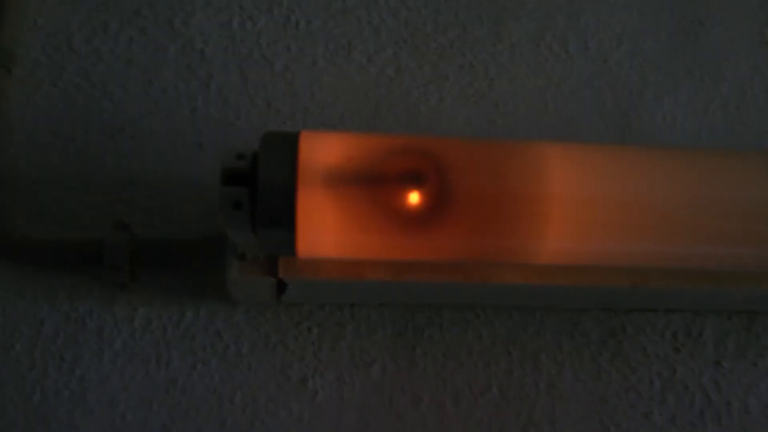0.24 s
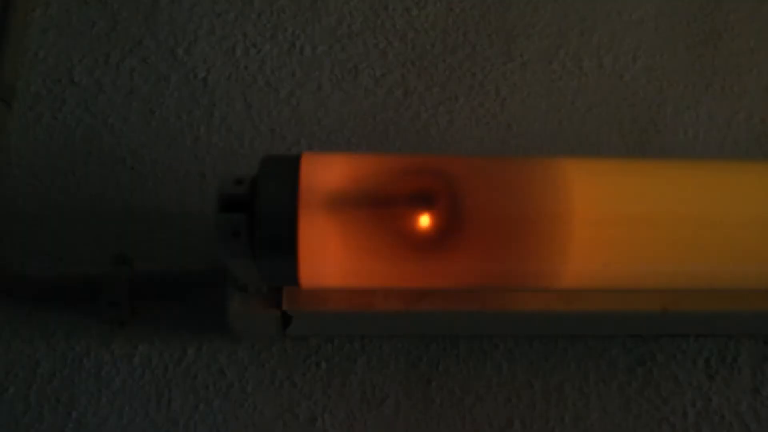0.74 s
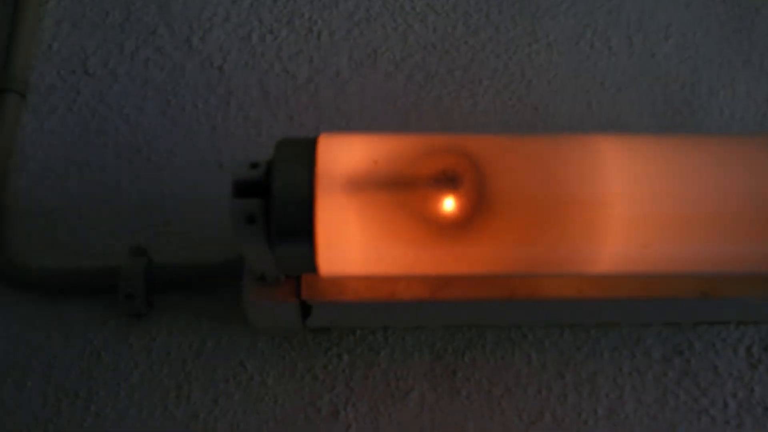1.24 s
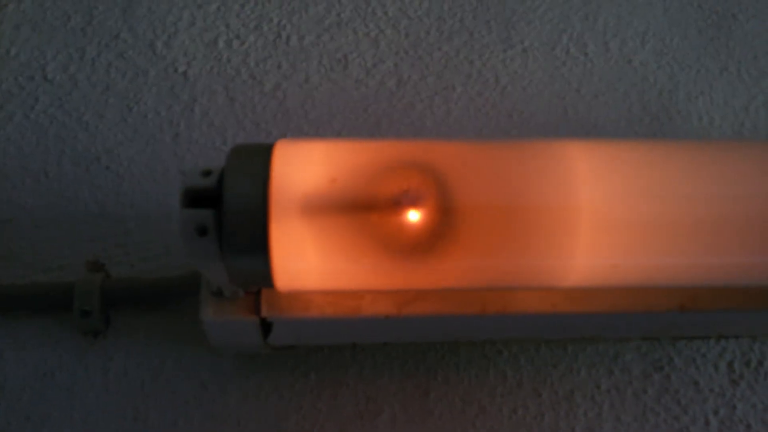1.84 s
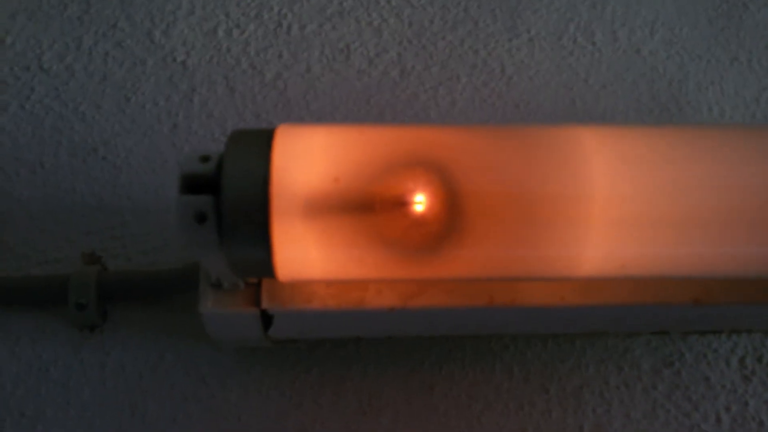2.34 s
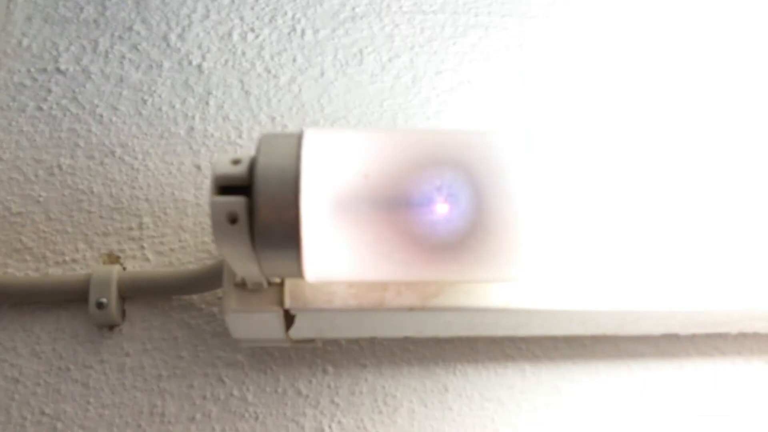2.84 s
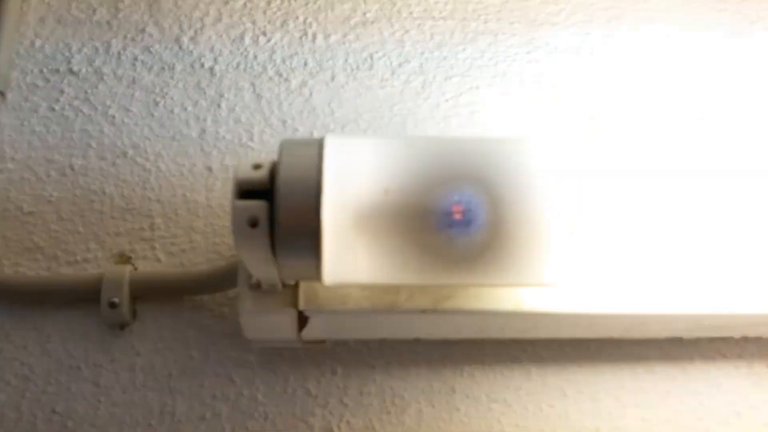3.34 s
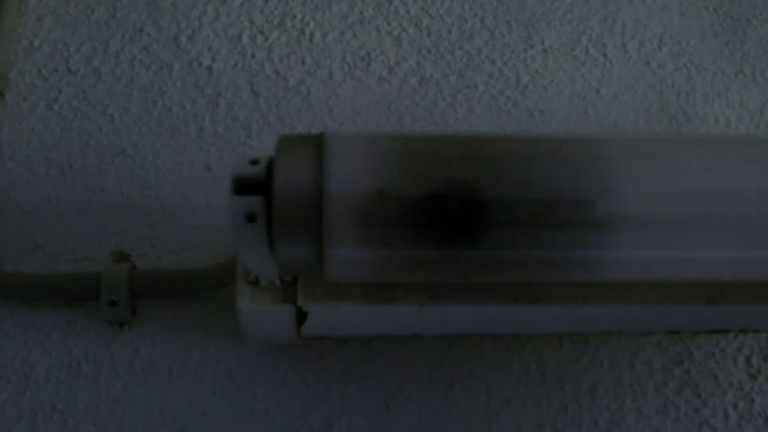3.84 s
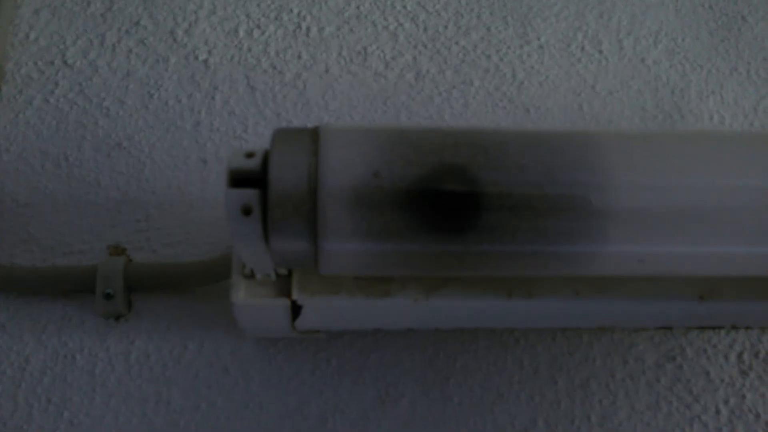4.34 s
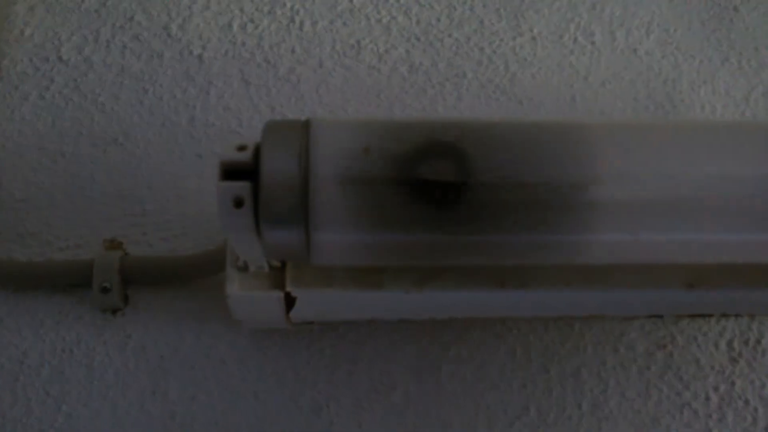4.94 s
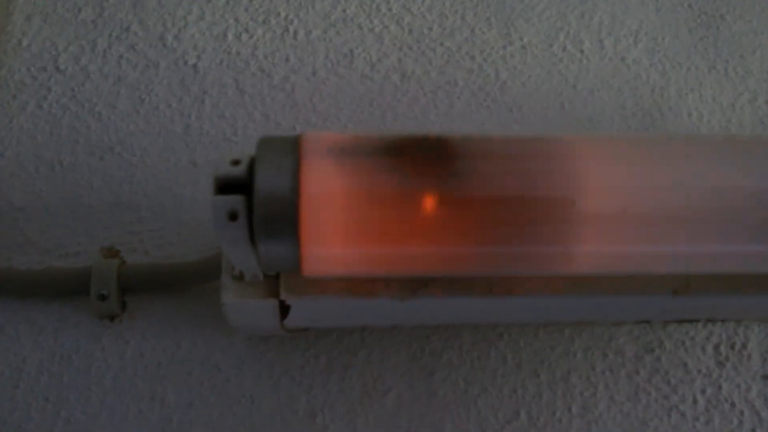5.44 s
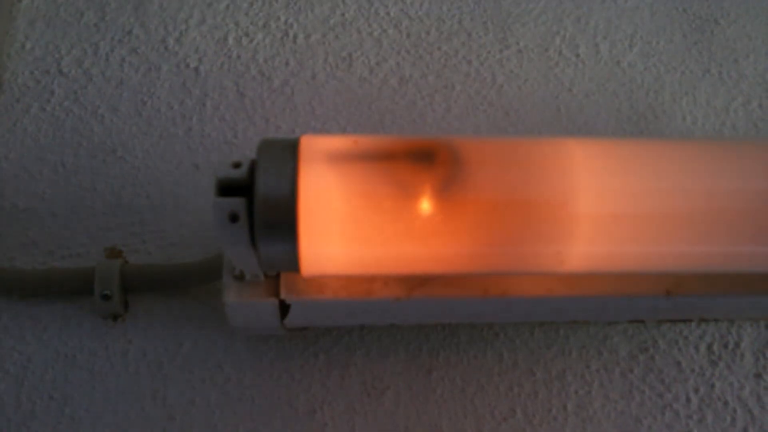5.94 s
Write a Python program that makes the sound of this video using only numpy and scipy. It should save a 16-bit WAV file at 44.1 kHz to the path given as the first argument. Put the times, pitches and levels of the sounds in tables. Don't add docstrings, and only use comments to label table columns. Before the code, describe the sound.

In a bare echoing room, a quiet building drone, steady soft hiss and low unsteady ballast hum lie under everything. At the start a far bird gives faint falling chirps and thin glass tones barely ring; a soft microphone bump comes at 0.2 s. Tiny dry starter clicks snap at 0.63 to 0.74 s, and the bird calls again near 1 s. A light metallic tick at 1.4 s leads to sharp jolts from 1.65 s, growing into a loud, ringing, tinny sheet-metal clatter at 1.9 to 2.2 s that dies in echo. Weaker ticks follow at 2.6 to 2.8 s, with a faint glass ping at 2.9. A knock and rattle comes at 3.4 s, a chirp at 3.7, then faint dull ticks from 4.3 to 5 s. The bird chirps at 5.2; a hard clank with a microphone thump hits at 5.34, then scattered rattles until 5.9 and a last chirp at 6 s.

```python
import sys
import numpy as np
from scipy import signal
from scipy.fft import rfft, irfft
from scipy.io import wavfile
from scipy.ndimage import uniform_filter1d

SR = 44100
rng = np.random.default_rng(int(sys.argv[2]) if len(sys.argv) > 2 else 0)


def amplitude_ratio(level_db):
    exponent = np.asarray(level_db, float) / 20
    return 10 ** exponent


def transcribe(signal):
    frames = np.atleast_2d(signal).T
    limited = np.clip(frames, -1, 1)
    pcm = np.round(limited * 32767).astype(np.int16)
    wavfile.write(sys.argv[1], SR, pcm)


N = 272979


def rms_one(x):
    return x / np.sqrt(np.mean(x ** 2) + 1e-20)


def in_time(rows):
    s, *columns = np.transpose(rows)
    return [np.interp(np.arange(N) / SR, s, c) for c in columns]


def band(x, low_hz, high_hz):
    edges_hz = [low_hz, min(high_hz, .45 * SR)]
    return signal.sosfilt(signal.butter(2, edges_hz, "band", fs=SR, output="sos"), x)


def coloured(points):
    hz = np.fft.rfftfreq(N, 1 / SR) + 1
    point_hz, point_db = np.array(points).T
    gain = amplitude_ratio(np.interp(np.log(hz), np.log(point_hz), point_db))
    return rms_one(irfft(gain * rfft(rng.standard_normal(N)), N))


def resonance(x, hz, width_hz):
    r = np.exp(-np.pi * width_hz / SR)
    rise = (1 - r * r) / 2
    return signal.lfilter([rise, 0, -rise], [1, -2 * r * np.cos(2 * np.pi * hz / SR), r * r], x)


def bursts(at_s, db, length_ms):
    out = np.full(N + 2000, 1e-18)
    t = np.arange(2000) / SR
    noises = rng.standard_normal((len(at_s), 2000))
    for s, level_db, ms, noise in zip(at_s, db, length_ms, noises):
        shape = (1 - np.exp(-t / 0.0019)) * np.exp(-1000 * t / max(ms, .3))
        out[round(s * SR):][:2000] += amplitude_ratio(level_db) * shape * noise
    return out[:N]


# start in seconds, level of the low modes in dB,
# middle modes over the low in dB, high modes over the low in dB.
JOLTS = [(1.395, -35.5, 3, -10), (1.649, -26, 4, 4), (1.681, -19, -1, -10), (1.863, -16.5, 0.5, -4),
         (1.9, -13, -1.5, -4.5), (1.964, -17, -4, -13), (2.196, -13, -2.5, -13), (2.589, -26.5, 2.5, -6.5),
         (2.633, -34, 5.5, 0.1), (2.669, -32, 4, -11), (2.829, -42.5, 11, -9), (3.39, -22.5, -4, -7),
         (3.412, -29, -1.5, 1), (3.768, -33.5, -0.5, -19), (3.909, -51.5, 18.5, -5),
         (4.2663, -32, -12, -46), (4.355, -42, 9.5, -24), (4.576, -46, 4, -28), (4.8, -37, 5, -14),
         (4.862, -38, 7, -10), (4.888, -44, 11, -2), (5.142, -37.5, -16, -19), (5.32, -33, 1, -23),
         (5.335, -17, -4.5, -11.5), (5.369, -38.5, 16.5, 0), (5.599, -46.5, 17.5, -9), (5.677, -29, 3, -18),
         (5.725, -35, 3, -5), (5.745, -20, 2, -23), (5.894, -28.5, -.5, -18)]
JOLT_CRACK_DB = [2.5, 2.5, 9]


def ticks(tray_share):
    reflector_ms, tray_ms = 2.73, 5.93
    s, low_db, middle_db, high_db = np.transpose(JOLTS)
    ms = reflector_ms + (tray_ms - reflector_ms) * tray_share[(s * SR).astype(int) + 300]
    levels = [low_db, low_db + middle_db, low_db + high_db]
    out = 0
    for g in range(3):
        force = bursts(s, levels[g] + JOLT_CRACK_DB[g], ms)
        out = out + fixture_body(force, g, tray_share ** 3, damping=1.38)
    return out


# start in seconds, level of the low modes in dB, shaking time in seconds,
# middle modes over the low in dB, high modes over the low in dB.
RATTLE_BURSTS = [(1.395, -42.5, 0.0024, 0, -3.5), (1.649, -27.5, 0.023, 3, -30), (1.864, -40, .03, 5, -18),
                 (1.901, -29, 0.097, .6, -1.5), (2.019, -24.5, .19, 0, -0.3), (2.432, -44, 0.024, 2.5, -6),
                 (2.589, -40.5, 0.036, -5.5, -21), (2.634, -42.5, 0.069, -0.4, -5.5),
                 (2.83, -52.5, .02, -1, -6), (3.404, -30.5, 0.027, -0.5, 0), (3.45, -34, 0.17, -1.4, -16),
                 (3.661, -37, 0.24, -3, -19), (4.269, -46.5, 0.16, -25, -26), (4.354, -47, 0.11, -10, -23),
                 (4.577, -54.5, 0.045, -9, -11), (4.802, -47.5, 0.067, -3.5, -2.5),
                 (4.862, -39.5, 0.049, 2, -5), (4.95, -45, 0.26, -2.5, -14), (5.25, -52.5, 0.095, 1, -2),
                 (5.336, -32, 0.13, -3, -5.5), (5.5, -40, 0.15, -6.5, -18), (5.678, -35, 0.12, -23, -11.5),
                 (5.748, -38.5, 0.12, -5, -18), (5.896, -44.5, 0.1, -2, -6)]
ECHO_FADE_DB_PER_S = [62, 82.5, 86]


def rattle_levels():
    build_up_s, sag_db_per_s = .018, 24
    stop_db, stop_s = 2, 0.005
    power = np.full((3, N), 1e-10)
    for s, db, shake_s, middle_db, high_db in RATTLE_BURSTS:
        start = round(s * SR)
        t = np.arange(N - start) / SR
        after = np.clip(t - build_up_s - shake_s, 0, None)
        direct_db = db - sag_db_per_s * (t - after) - stop_db * (1 - np.exp(-after / stop_s))
        rise = np.minimum(t / build_up_s, 1) ** 2
        for g, tilt_db in enumerate([0, middle_db, high_db]):
            level_db = direct_db + tilt_db - ECHO_FADE_DB_PER_S[g] * after
            power[g, start:] += (rise * amplitude_ratio(level_db)) ** 2
    low_db, middle_db, high_db = 10 * np.log10(power)
    return low_db, middle_db - low_db, high_db - low_db


CLUTTER_RANGE_HZ = (1750, 3150)


def rattle(low_db, middle_db, high_db, tray_share):
    hits = rng.random(N) < 700 / SR
    strength = amplitude_ratio(4.5 * np.minimum(rng.exponential(1, N), 4))
    contacts = hits * strength * rng.choice([-1, 1], N)
    force = 0.24 * rms_one(contacts) + 0.8 * rng.standard_normal(N)
    force = signal.sosfilt(signal.butter(8, 10300, fs=SR, output="sos"), force)
    levels = [low_db, low_db + middle_db, low_db + high_db]
    wander = np.interp(np.arange(N) / SR / .035, np.arange(400), rng.standard_normal(400))
    tray_share = tray_share + .2 * wander
    body = sum(amplitude_ratio(levels[g] - 1.5) * fixture_body(force, g, tray_share, damping=.85) for g in range(3))
    clutter_db = levels[1] - 16.5 + 11.5 * tray_share
    clutter = amplitude_ratio(clutter_db) * rms_one(band(force[::-1], *CLUTTER_RANGE_HZ))
    return body + clutter + amplitude_ratio(low_db) * loose_panel(force)


# start in seconds, share of the tray from 0 to 1,
# frequency of the loose panel in Hz, its width in Hz, its level over the low modes in dB.
SHAKING_PARTS = [(1.39, 0.93, 4300, 597, -4), (1.646, 0.15, 1072, 60, -3), (1.861, 0.01, 1000, 196, -13),
                 (2.585, 0.11, 990, 60, -18), (3.38, 0.05, 6300, 397, -28), (3.617, 0.23, 640, 147, -10.5),
                 (3.96, 0.66, 3900, 600, -34), (4.26, 0.53, 1670, 504, -14.5), (4.795, 0.59, 1310, 198, -9),
                 (4.999, 0.6, 673, 358, -9.5), (5.315, 0.88, 1740, 400, 4), (5.36, 0.66, 797, 30, -4.5),
                 (5.719, 0.48, 2000, 400, -5.5), (5.89, 0.92, 650, 300, -5.5)]


def loose_panel(force):
    out = np.zeros(N)
    for s, _, hz, width_hz, db in SHAKING_PARTS:
        start = round(s * SR)
        once = resonance(force, hz, 1.96 * width_hz)
        twice = resonance(once, hz, 1.96 * width_hz)
        out[start:] = amplitude_ratio(db) * rms_one(twice)[start:]
    return out


def tray_share_in_time():
    rows = np.array(SHAKING_PARTS)
    current = np.searchsorted(rows[:, 0], np.arange(N) / SR) - 1
    return uniform_filter1d(rows[np.clip(current, 0, None), 1], size=400)


REFLECTOR_MODES_HZ = [555, 795, 826, 858, 917, 972, 1001, 1030, 1099, 1149, 1372, 1650, 2007, 2712, 2890,
                      3450, 3737, 4015, 4432, 4935, 5259, 5299, 5600, 5830, 6200, 8270, 9200]
# width in Hz, level in dB.
REFLECTOR_MODES_RING = [(38.4, -21), (14.4, 8), (12.3, 2), (13.5, 5), (17.5, 4.5), (13.5, -59), (9, 7.5),
                        (9.9, 6.5), (17.1, 5), (11.9, -27), (16.2, 1), (60, -18), (23.4, 3), (32, 4),
                        (30, -18), (120, -4.5), (31.6, -1.5), (31.7, -11.5), (22, -4), (51, -6.5), (11, 4),
                        (11, -5), (120, -4.5), (122, -4), (223, -5), (90, -23), (496, -24.5)]
# frequency in Hz, width in Hz, level in dB.
TRAY_MODES = [(553, 89, 5), (590, 24, -39), (797, 73, 4.5), (1106, 23, -4), (1140, 480, -3.5),
              (1934, 126, -7.5), (2094, 56, -3.5), (2707, 41, -6.5), (3398, 123, -8), (4300, 400, -17.5),
              (4770, 420, -7), (6440, 120, -15), (7900, 2100, -18.5)]


def fixture_body(force, group, tray_share, damping):
    share = np.clip(tray_share, 0, 1)
    reflector_rest_db, tray_rest_db = MODE_GROUPS[group][2:]
    reflector_modes = np.column_stack([REFLECTOR_MODES_HZ, REFLECTOR_MODES_RING])
    reflector = sheet_metal(force, reflector_modes, group, reflector_rest_db, damping)
    tray = sheet_metal(force, TRAY_MODES, group, tray_rest_db, damping)
    return np.sqrt(1 - share) * reflector + np.sqrt(share) * tray


# lowest frequency in Hz, highest in Hz, then the level in dB
MODE_GROUPS = [
    (493, 1400, -7.5, -16.5),
    (1715, 4640, -13.5, -19.5),
    (4600, 7560, -23.5, -23.5),
]


def sheet_metal(force, modes, group, rest_db, damping):
    low_hz, high_hz = MODE_GROUPS[group][:2]
    click = np.eye(1, 16384)[0]
    out = amplitude_ratio(rest_db) * band(click, low_hz, high_hz)
    for k, (hz, width_hz, db) in enumerate(modes):
        if low_hz <= hz and (hz < high_hz or group == 2):
            out += (-1) ** k * amplitude_ratio(db) * resonance(click, hz, damping * width_hz)
    if group == 2:
        out += amplitude_ratio(rest_db - 10) * band(click, high_hz, 17500.0)
    out = signal.sosfilt(signal.butter(2, 1.064 * low_hz, "high", fs=SR, output="sos"), out)
    return signal.fftconvolve(force, out / np.sqrt(np.sum(out ** 2)))[:N]


def air(level_db):
    noise = rng.standard_normal(N)
    knots = rng.standard_normal((11, 400))
    u = np.arange(N) / SR / .05
    out = np.zeros(N)
    for hz, row in zip(range(11000, 15000, 370), knots):
        patch_db = level_db - 53 + 10.5 * np.interp(u, np.arange(400), row)
        whistle = resonance(resonance(noise, hz, 330), hz, 330)
        out += amplitude_ratio(patch_db) * rms_one(whistle)
    return out


def room(x):
    t60_s, dull_hz, gap_s = 1, 4660, 0.0027
    t = np.arange(SR) / SR
    noise = signal.sosfilt(signal.butter(6, 10000, fs=SR, output="sos"), rng.standard_normal(SR))
    dull = signal.lfilter(*signal.butter(1, dull_hz, fs=SR), noise)
    tail = dull * amplitude_ratio(-60 * t / t60_s) + (noise - dull) * amplitude_ratio(-60 * t / (.6 * t60_s))
    tail *= np.clip((t - gap_s) / .015, 0, 1)
    return signal.fftconvolve(x, tail / np.sqrt(np.sum(tail ** 2)))[:N]


# start in seconds, peak
# level in dB, highest frequency in Hz.
STARTER_SNAPS = [
    (.6335, -46, 9000),
    (0.637, -38, 8500),
    (.693, -57, 11100),
    (0.7307, -33, 14000),
    (0.733, -25, 9000),
    (0.7369, -32, 14000),
    (3.363, -46, 6000),
]


def snaps():
    out = np.zeros(N)
    for s, peak_db, top_hz in STARTER_SNAPS:
        click = band(np.eye(1, 400)[0], 3800, top_hz)
        out[round(s * SR):][:400] += amplitude_ratio(peak_db + 11.0) * click
    return out


# start in seconds, peak level in dB.
MICROPHONE_BUMPS = [
    (0.21, -49),
    (5.337, -24),
    (4.3, -59),
    (0.728, -45.5),
    (0.792, -47),
]


def thumps():
    s, peak_db = np.transpose(MICROPHONE_BUMPS)
    return band(bursts(s, peak_db + 9.5, 6.3 + 0 * s), 36, 1000)


# start in seconds, level in dB, frequency in Hz,
# time to fade by 60 dB in seconds.
GLASS_PINGS = [
    (0, -67, 1300, 1.9),
    (0, -70.5, 1660, 1.3),
    (.645, -61, 1683, 0.092),
    (.68, -73, 1296, 0.93),
    (2.918, -54.5, 1670, 0.38),
    (.35, -74, 697, 9.0),
]


def pings():
    t = np.arange(N) / SR
    out = np.zeros(N)
    for s, db, hz, t60_s in GLASS_PINGS:
        level = amplitude_ratio(db - 60 * np.clip(t - s, 0, 5) / t60_s) * (t > s)
        out += level * np.sin(2 * np.pi * hz * t)
    return out


# time in seconds, level in dB.
HUM_SWELL = [(0.0, -67), (0.21, -56), (0.86, -77.5), (1.24, -51), (1.65, -51.5), (1.74, -43.5),
             (2.89, -56.5), (3.29, -80), (3.43, -57), (3.64, -53), (4.26, -72.5), (4.45, -61), (4.57, -74),
             (4.62, -56), (4.71, -88), (5.72, -64), (6.02, -73), (6.19, -76)]


def hum():
    hum_hz = 93.3
    wobble = rms_one(resonance(rng.standard_normal(N), hum_hz, 19))
    tone = np.sqrt(2) * np.sin(2 * np.pi * hum_hz * np.arange(N) / SR)
    return amplitude_ratio(in_time(HUM_SWELL)[0] + 4) * (0.46 * tone + 0.19 * wobble)


# start in seconds, level in dB, first frequency in Hz,
# last frequency in Hz, length in seconds.
BIRD_CHIRPS = [(0, -61, 4700, 4060, 0.049), (0.028, -63.5, 4110, 3380, 0.069),
               (.13, -72, 4680, 4300, 0.063), (0.162, -67.5, 3800, 3420, 0.045),
               (0.959, -58.5, 4400, 3930, 0.057), (0.998, -61, 3620, 3090, 0.06),
               (1.097, -69, 4300, 3930, 0.057), (1.155, -68, 3490, 3160, 0.032),
               (3.693, -55, 4600, 4390, 0.071), (3.793, -63, 4600, 4070, 0.091),
               (5.241, -51.5, 4620, 3750, 0.071), (6.02, -50, 4600, 4210, 0.029),
               (6.064, -54, 4600, 3670, 0.067)]


def chirps():
    out = np.zeros(N)
    for s, db, start_hz, end_hz, length_s in BIRD_CHIRPS:
        u = np.arange(round(length_s * SR)) / (length_s * SR)
        fall_hz = end_hz + (start_hz - end_hz) * np.exp(-2.5 * u)
        hz = fall_hz + 260 * np.sin(2 * np.pi * 140 * length_s * u)
        whistle = np.sin(2 * np.pi * np.cumsum(hz) / SR)
        out[round(s * SR):][:len(u)] += amplitude_ratio(db) * np.sin(np.pi * u) * whistle
    return 0.75 * out + 1.52 * room(out)


# frequency in Hz, level in dB per Hz.
RUMBLE_COLOUR = [(12, -30), (20, -24), (38, -15), (75, 5.5), (102, 3.5), (235, -7), (500, -19), (650, -12),
                 (1100, -120)]
# time in seconds, level in dB.
BUILDING_ACTIVITY = [(0, -0.5), (.7, -0.5), (1.3, -1.5), (2.3, 3.5), (3.2, -1), (4, 0.5), (4.3, -2.1),
                     (5.1, 3), (6.19, 5)]


def rumble(burst_db):
    noise = coloured(RUMBLE_COLOUR)
    busy_db = in_time(BUILDING_ACTIVITY)[0]
    strength_db = burst_db + 35
    sluggish_db = 10 * np.log10(uniform_filter1d(amplitude_ratio(strength_db) ** 2, size=SR // 2) + 1e-12)
    deep = np.hypot(amplitude_ratio(-67), amplitude_ratio(-59.5 + 0.34 * sluggish_db)) * amplitude_ratio(0.9 * busy_db)
    upper = np.hypot(amplitude_ratio(-63.5), amplitude_ratio(-54 + 0.33 * strength_db)) * amplitude_ratio(busy_db)
    return deep * rms_one(band(noise, 18.5, 68.4)) + upper * rms_one(band(noise, 109, 860))


# frequency in Hz, level in dB per Hz.
HISS_COLOUR = [(180, -55), (300, 1.5), (559, -10), (884, -6.5), (1330, -11), (1650, -11.5), (2730, -14.5),
               (13200, -16.5), (15000, -12.5)]


def hiss():
    return amplitude_ratio(-63.5) * coloured(HISS_COLOUR)


def scene():
    tray_share = tray_share_in_time()
    jolts = ticks(tray_share)
    levels = rattle_levels()
    fixture = jolts + amplitude_ratio(-12.0) * room(jolts) + rattle(*levels, tray_share) + air(levels[0])
    small_sounds = snaps() + thumps() + pings() + hum() + chirps()
    return (fixture + small_sounds + rumble(levels[0]) + hiss())[None]


# frequency in Hz,
# lowest level kept against the body in dB.
MASKED_TREBLE = [(7000, -41), (9000, -36), (10200, -33), (10800, -29), (12000, -28), (14500, -27.5)]


def starve_treble(x):
    lead = 1024 - 813
    hz, _, frames = signal.stft(np.pad(x, (lead, 0)), SR, "cosine", 2048, 1024)
    power = np.abs(frames) ** 2 + 1e-20
    body = power[(hz > 500) & (hz < 6500)].mean(0)
    luck = rng.standard_normal((24, len(body)))
    for k, low in enumerate(range(320, 704, 16)):
        under_db = 10 * np.log10(power[low:low + 16].mean(0) / body)
        limit_db = np.interp(hz[low], *np.transpose(MASKED_TREBLE)) + 3.5 * luck[k]
        frames[low:low + 16] *= under_db > limit_db
    return signal.istft(frames, SR, "cosine", 2048, 1024)[1][lead:lead + N]


def top_cut(x):
    return signal.sosfilt(signal.butter(12, 15600, fs=SR, output="sos"), x)


def record(dry):
    cut = signal.sosfilt(signal.cheby2(14, 45, 14980, fs=SR, output="sos"), dry)
    finished = starve_treble(cut[0])[None]
    return top_cut(finished)


dry = scene()
out = record(dry)
transcribe(out)
```